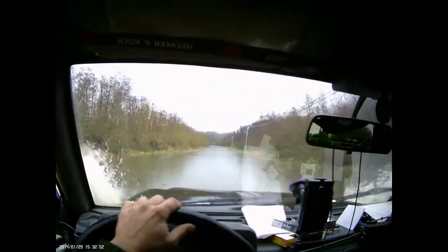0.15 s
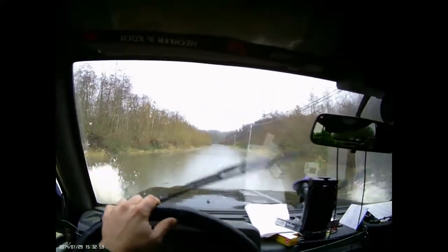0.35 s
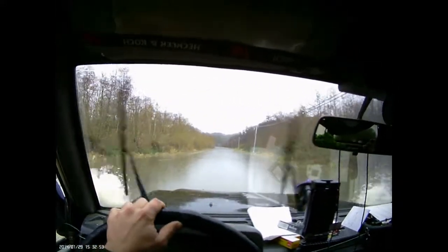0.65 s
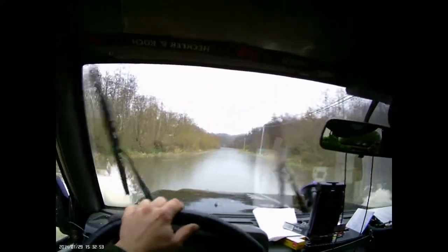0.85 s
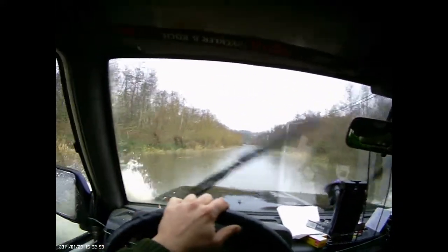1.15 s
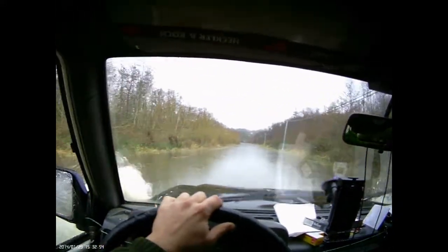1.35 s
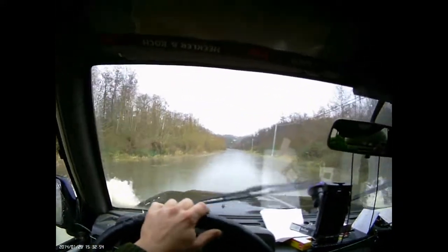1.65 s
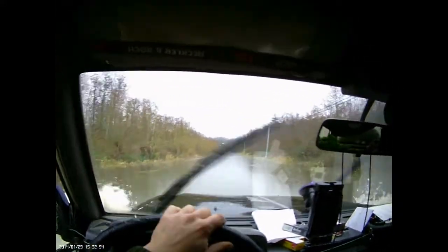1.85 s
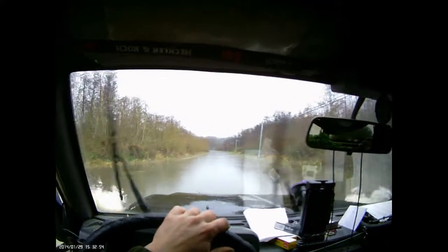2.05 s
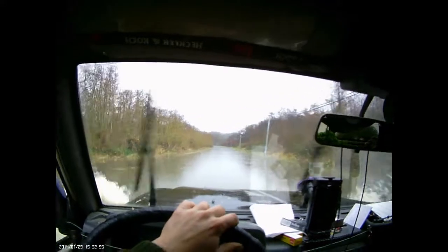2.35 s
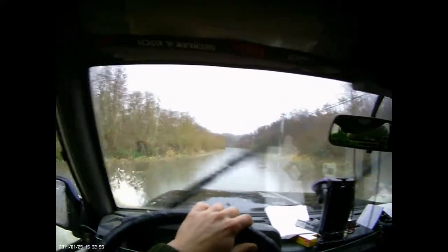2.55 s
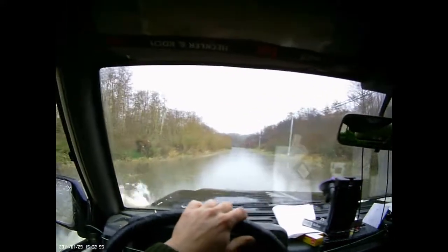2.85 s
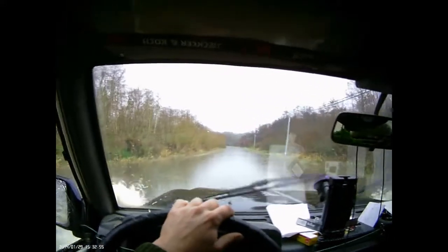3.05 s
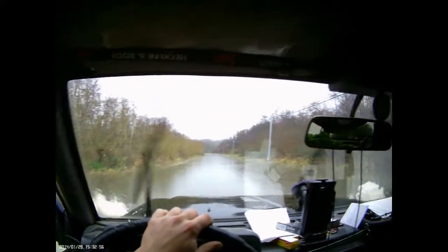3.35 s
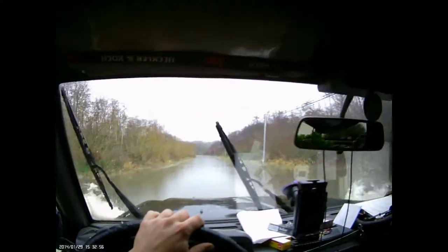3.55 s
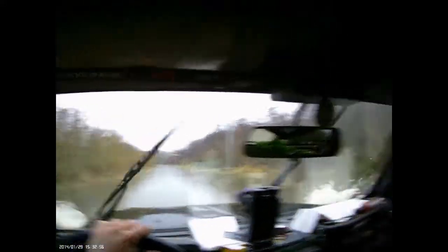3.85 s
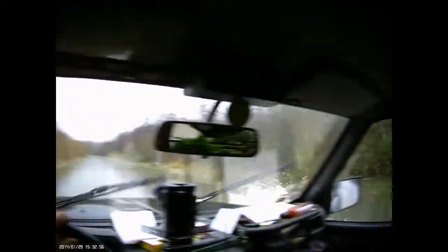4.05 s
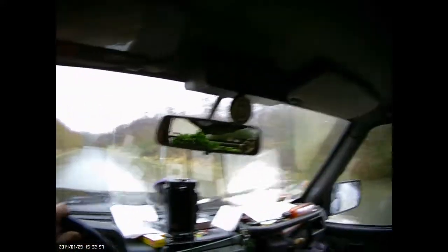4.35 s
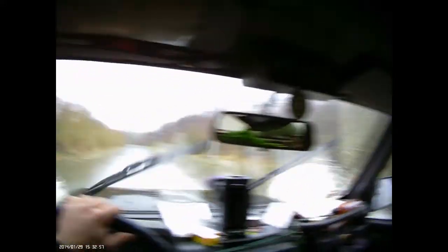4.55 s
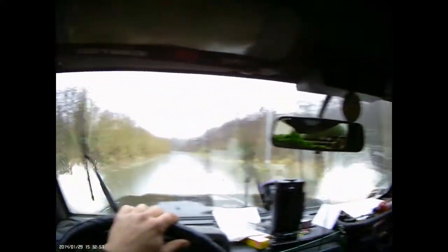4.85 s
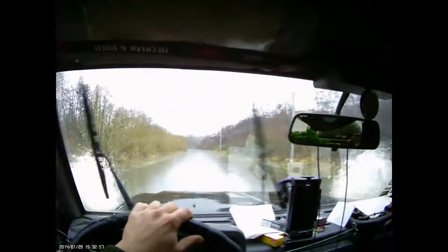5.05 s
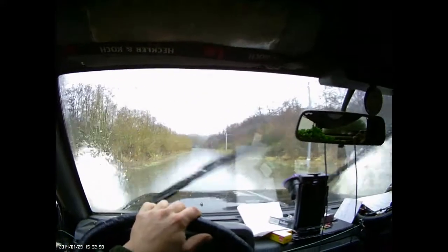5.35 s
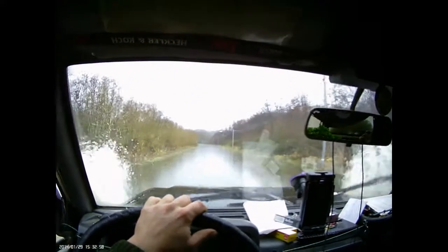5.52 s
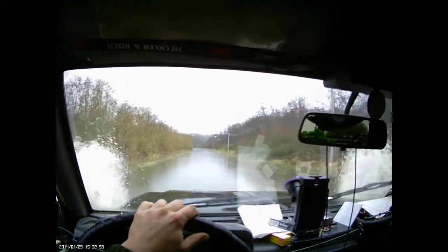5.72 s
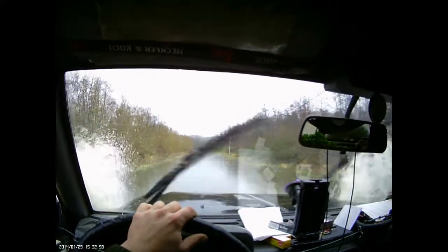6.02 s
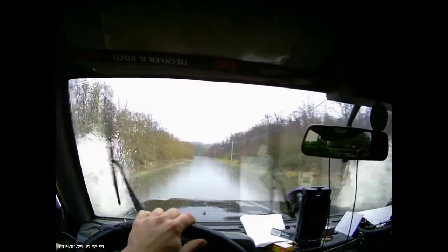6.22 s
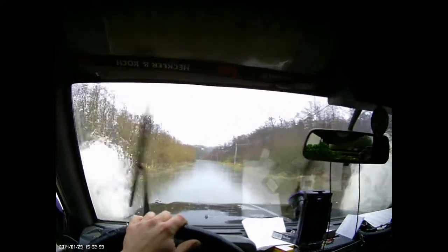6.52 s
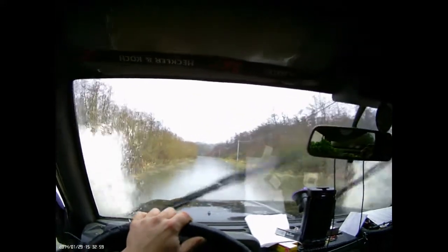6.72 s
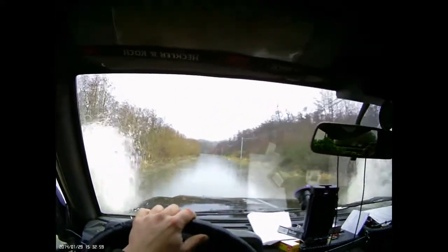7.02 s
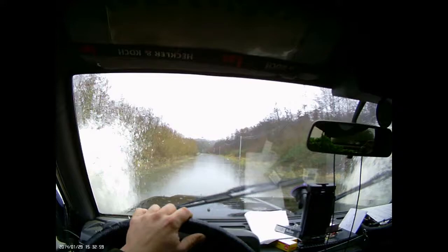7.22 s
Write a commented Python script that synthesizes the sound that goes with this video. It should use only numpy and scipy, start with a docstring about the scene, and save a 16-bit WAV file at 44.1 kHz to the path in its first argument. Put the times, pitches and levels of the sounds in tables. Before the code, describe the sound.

Inside a vehicle cab wading through floodwater, a deep overloaded engine drone throbs and slowly rises while water slaps the floor and spray rasps.

```python
"""Inside the cab of an off-road vehicle that wades through a flooded track; its engine slows a little, then speeds up.
Locked sine waves make the four-cylinder engine's boom, a wave too low to be a tone shakes the drive line, and
coloured noise makes the engine's growl, the rumble under the floor, the spray and a faint whine.
Short pulses slap the floor. The bass overloads the small microphone on one side, so that
every crest of pressure rasps and every trough goes quiet."""
import sys
import numpy as np
from scipy import signal
from scipy.fft import rfft, irfft, next_fast_len
from scipy.io import wavfile
from scipy.ndimage import uniform_filter1d, map_coordinates

SR = 44100
rng = np.random.default_rng(int(sys.argv[2]) if len(sys.argv) > 2 else 0)


def to_wav(s):
    """Save 16-bit WAV."""
    ch = np.atleast_2d(s).T  # columns
    pcm = np.round(np.clip(ch, -1, 1) * 32767)  # PCM
    wavfile.write(sys.argv[1], SR, pcm.astype(np.int16))


N = 325458
TIME = np.arange(N) / SR

# How fast the engine fires. Each row: time in seconds, firing rate in Hz.
ENGINE_SPEED = [(0.0, 67.77), (0.65, 65.61), (1.55, 64.56), (2.4, 63.48), (3.5, 64.7), (4.05, 66.29),
                (4.8, 69.5), (6.8, 77.68), (7.38, 79.1)]
# The big waves that slap the floor pan. Each row: time in seconds, knock level in dB, heave level in dB.
BIG_WAVES = [(0.232, -2.5, -27), (0.322, -8, -25), (0.395, -1, -7), (.713, -3, -11), (.775, -11, -18),
             (1.035, -7, -11), (1.514, -5.5, -25), (1.545, -6.5, -12), (1.637, -2.5, -31),
             (1.73, -12.5, -13.5), (2.01, -6.5, -22), (2.058, -14, -26), (2.167, -6, -32), (2.228, -6, -28),
             (2.451, -2, -28), (2.513, -6.5, -18), (2.952, -3, -19), (3.014, -2.5, -11.5),
             (3.108, -7.5, -25), (3.185, -2, -32), (3.558, -6, -20), (3.62, -7.5, -25), (3.97, -9, -21),
             (4.151, -4, -23), (4.21, -4.5, -15), (4.271, -9, -28), (4.375, -4, -24), (4.419, -12, -14),
             (5.208, -1.5, -16), (5.364, -12, -9), (5.777, -7, -6), (6.021, -9, -11), (6.11, -9.5, -23),
             (6.388, -19, -6.5), (6.72, -13, -14), (6.869, -3.5, -11.5), (6.935, -18, -9),
             (6.946, -8.5, -2.5)]
# The second order and the growl swell while the microphone is turned towards the passenger side.
TURN_S, TURN_WIDTH_S = 4.04, 0.72


def amp(db):
    """Turn decibels into gain."""
    return 10 ** (np.asarray(db) / 20)


def unit(x):
    """Scale to rms 1."""
    return x / np.sqrt(np.mean(x ** 2) + 1e-20)


def along(points, hz):
    """Read (Hz, value) points at any frequency, with straight lines on a log axis."""
    f, v = np.transpose(points)
    return np.interp(np.log(hz + 1), np.log(f + 1), v)


def curves(rows):
    """Draw straight lines between rows: one value per sample for each column after the time."""
    s, *cols = np.transpose(rows)
    return [np.interp(TIME, s, c) for c in cols]


def bell(x, width):
    """A smooth bump of height 1 around zero."""
    return np.exp(-(x / width) ** 2)


def wobble(rate):
    """A smooth random curve through `rate` random points a second."""
    points = rng.standard_normal(int(N * rate / SR) + 4)
    return map_coordinates(points, [TIME * rate])


def filtered(x, response):
    """Multiply the spectrum of x by a response of frequency."""
    m = next_fast_len(N + SR // 2)
    hz = np.fft.rfftfreq(m, 1 / SR)
    return irfft(rfft(x, m) * response(hz), m)[:N]


def noise(colour_db, patchy_db):
    """Coloured noise of rms 1, with random louder and softer patches in time and frequency."""
    z = signal.stft(rng.standard_normal(N), nperseg=512)[2]
    field = uniform_filter1d(rng.standard_normal(z.shape), size=6, axis=0)  # smooth over frequency
    field = uniform_filter1d(field, size=12, axis=1)  # smooth over time
    patchy = signal.istft(z * amp(patchy_db * unit(field)), nperseg=512)[1][:N]
    return unit(filtered(patchy, lambda hz: amp(colour_db(hz))))


def cab_levels():
    """The cab answers some engine speeds more than others: boom, second and third order in dB."""
    # How strongly the cab answers the engine.
    # Each row: firing rate in Hz, boom in dB, second order in dB, third order in dB.
    cab_answer = [(63.2, -1.5, -19, -20.5), (65.4, -3.5, -20.5, -23.2), (69.7, -6.5, -19, -33.5),
                  (70.8, -4, -15.5, -50), (75.4, -11.5, -21.5, -39), (76.64, -16.5, -12, -33),
                  (77.74, -13.5, -16.5, -42), (77.9, -11.5, -21, -49)]
    firing_hz, = curves(ENGINE_SPEED)
    rates, *orders = np.transpose(sorted(cab_answer))
    return [np.interp(firing_hz, rates, db) for db in orders]


def engine(unsteady_db=1.0, boom_waver_db=0.43, turn_db=11):
    """Each firing pumps the cab air; the low orders follow the cab's response and the weaker ones waver."""
    # Weaker engine orders; the halves come from unequal cylinders.
    # Each row: multiple of the firing rate, level in dB.
    weak_orders = [(.5, -16), (1.5, -28), (2.5, -40), (3.5, -41.5), (4, -34.5)]
    firing_hz, = curves(ENGINE_SPEED)
    boom_db, second_db, third_db = cab_levels()
    boom = amp(boom_db + boom_waver_db * wobble(2.82))
    second = amp(second_db + turn_db * bell(TIME - TURN_S, TURN_WIDTH_S))
    angle = 2 * np.pi * (np.cumsum(firing_hz) / SR - .5)
    # the cab resonates near the firing rate, which sets the boom a quarter cycle off the other orders
    sound = boom * np.cos(angle) + second * np.sin(2 * angle) + amp(third_db) * np.sin(3 * angle)
    for multiple, db in weak_orders:
        order = round(2 * multiple) / 2  # a whole or half order
        sound += amp(db + unsteady_db * wobble(2.5)) * np.sin(order * (angle + 2 * np.pi))
    return sound


def clatter(level_db=-34.5, follows_boom=0.37, turn_db=2.5):
    """The working engine growls in the low middle range, a little more when it booms."""
    # Colour of the engine's mechanical noise through the bulkhead.
    # Each row: frequency in Hz, relative level in dB per Hz.
    growl_colour = [(150, -41), (300, 4), (450, 2.5), (600, 3.5), (750, 1.5), (950, -7.5), (2000, -38)]
    boom_db, *_ = cab_levels()
    growl_db = level_db + follows_boom * boom_db + turn_db * bell(TIME - TURN_S, TURN_WIDTH_S)
    return amp(growl_db) * noise(lambda hz: along(growl_colour, hz), patchy_db=2.0)


def drive_line():
    """An unbalanced shaft shakes the body, too slowly to be heard as a tone."""
    # Shake of the drive line. Each row: time in seconds, rate in Hz, level in dB.
    shaft_shake = [(0, 18.5, -12), (1.5, 18.45, -11), (2, 18.15, -10), (3.2, 18, -11), (4, 18.5, -14),
                   (4.5, 18.9, -17), (5, 18.3, -21), (7.38, 18.25, -19)]
    shaft_hz, db = curves(shaft_shake)
    return amp(db) * np.cos(2 * np.pi * np.cumsum(shaft_hz) / SR)


def rumble(level_db=-13.5, surge_db=.5):
    """The bow wave churns under the floor; its crests break before they grow tall."""
    # Colour of the water under the floor. Each row: frequency in Hz, relative level in dB per Hz.
    churn_colour = [(4, -12.5), (14, 4.5), (32, -4), (50, 1.5), (85, -5), (115, -11), (180, -10),
                    (240, -19.5), (330, -23), (600, -41.5), (1200, -63.5)]
    churn = noise(lambda hz: along(churn_colour, hz), patchy_db=.5)
    broken = churn - np.logaddexp(0, 2 * (churn - 1)) / 2  # softly flattens crests near and above 1
    return amp(level_db + surge_db * wobble(2.99)) * unit(broken - broken.mean())


def spray(splatter_db=1.15, splash=0.46, splash_s=0.0023):
    """The wheels throw sheets of drops against the body, and each big slap adds a short splash."""
    # Colour of the spray through glass and doors. Each row: frequency in Hz, relative level in dB per Hz.
    spray_colour = [(150, -12.5), (350, 5.5), (560, 6.5), (780, 1.5), (950, 1.5), (1550, -2), (1900, 0),
                    (2550, 3), (3200, -13), (5000, -19), (6500, -24), (11500, -25.5), (14500, -33),
                    (15700, -39)]
    # Narrow resonances in the hiss. Each row: centre in Hz, width in Hz, lift in dB (below zero: a dip).
    hiss_resonances = [(2160, 43, -3.5), (2520, 160, -2.5), (3945, 510, 7.5), (5570, 240, 2.5),
                       (9100, 710, 7)]
    # Strength of the spray, which eases off and then grows again. Each row: time in seconds, level in dB.
    spray_strength = [(0, -28), (1.3, -30.5), (3.2, -31.5), (4.2, -30), (5.2, -29.5), (6.5, -28),
                      (7.38, -28)]

    def colour_db(hz):
        """The broad colour plus the narrow resonances."""
        return along(spray_colour, hz) + sum(db * bell(hz - f, w) for f, w, db in hiss_resonances)

    hiss_db, = curves(spray_strength)
    hiss = noise(colour_db, patchy_db=0.5)
    splashes = np.ones(N)
    for s, knock_db, _ in BIG_WAVES:
        splashes += splash * amp(knock_db) ** 2 * bell(TIME - s, splash_s)
    return amp(hiss_db + splatter_db * wobble(40)) * splashes * hiss


def whine(centre_hz=12600, width_hz=70, first_s=.06, period_s=.5, length_s=0.11, level_db=-59.5, waver_db=1.5):
    """A thin, fuzzy whistle: a narrow band of noise in short, evenly spaced spells."""
    from_middle = (TIME - first_s + period_s / 2) % period_s - period_s / 2
    shape = bell(from_middle ** 2, length_s ** 2)  # squares give a flatter top
    spells = amp(level_db + waver_db * wobble(1.87)) * shape
    return spells * unit(filtered(rng.standard_normal(N), lambda hz: bell(hz - centre_hz, width_hz)))


def slaps(waves, knock_s=0.002, heave_s=0.018):
    """A wave gives the floor one sharp push, inside a slower heave that swings back."""
    out = np.zeros(N)
    for s, knock_db, heave_db in waves:
        near = slice(max(0, round((s - .08) * SR)), round((s + .08) * SR))
        t = TIME[near] - s
        knock = np.exp(-np.hypot(t, knock_s / 10) / knock_s)  # a spike with a slightly rounded tip
        heave = (1 - 2 * (t / heave_s) ** 2) * bell(t, heave_s)
        out[near] += amp(knock_db) * knock + amp(heave_db) * heave
    return out


def wavelets(count=16, knock_db=-13.5, heave_db=-18.5, scatter_db=2.5):
    """Small waves at random moments: rows of time in seconds, knock level in dB, heave level in dB."""
    s = rng.uniform(0, N / SR, count)
    levels = [knock_db, heave_db] + scatter_db * rng.standard_normal((count, 2))
    return np.column_stack([s, levels])


def scene():
    """Sound pressure in the cab, in units of the microphone's overload point."""
    machine = engine() + clatter() + drive_line()
    water = rumble() + spray() + slaps(BIG_WAVES) + slaps(wavelets())
    return (machine + water + whine())[None]


def record(dry, drive=1.093, gain_db=-28.0, settle_s=0.44, top_hz=15700):
    """The overloaded microphone stretches crests and chokes troughs, so the bass chops all the hiss."""
    bent = np.exp(drive * dry[0])
    # the very tallest crests round off
    bent = bent / (1 + (bent / 11.5) ** 3) ** (1 / 3)
    # its bias settles on the running mean, which holds the average gain steady
    bias = uniform_filter1d(bent, size=round(settle_s * SR))
    # the treble fades out over the last 900 Hz below top_hz
    band = lambda hz: np.clip((top_hz - hz) / 900, 0, 1)
    return amp(gain_db) * filtered(bent / bias - 1, band)[None]


dry = scene()
out = record(dry)
to_wav(out)
```